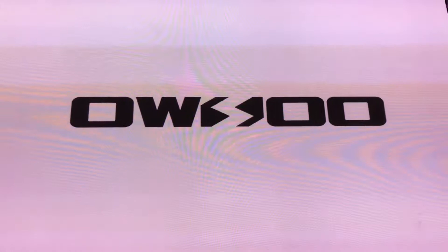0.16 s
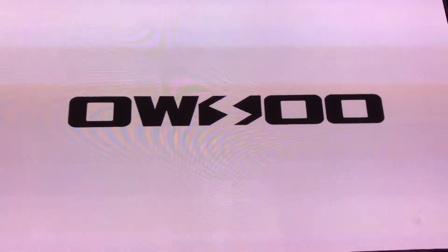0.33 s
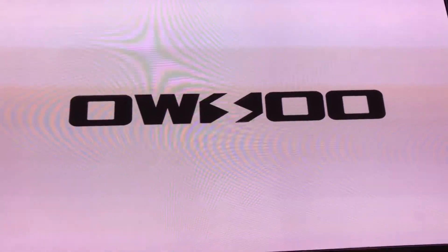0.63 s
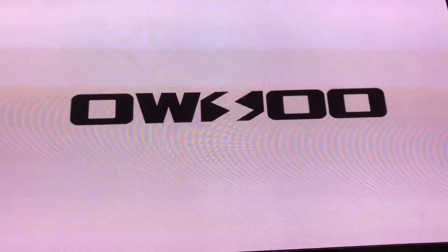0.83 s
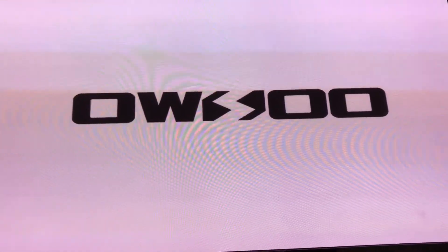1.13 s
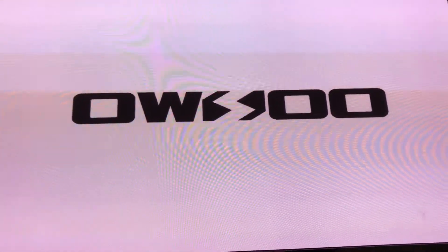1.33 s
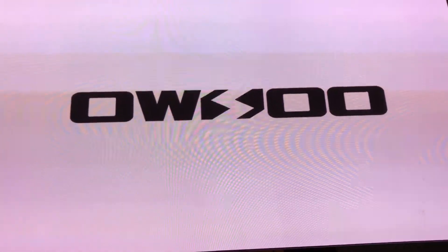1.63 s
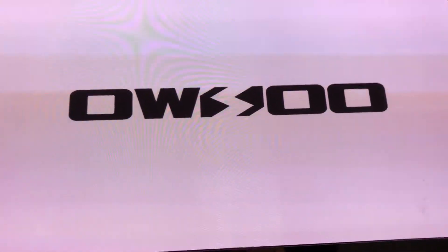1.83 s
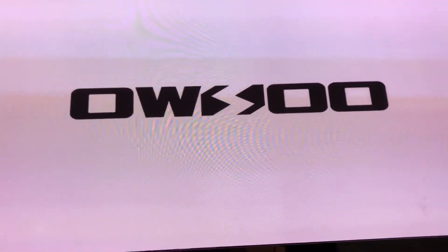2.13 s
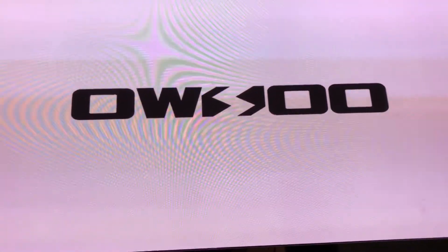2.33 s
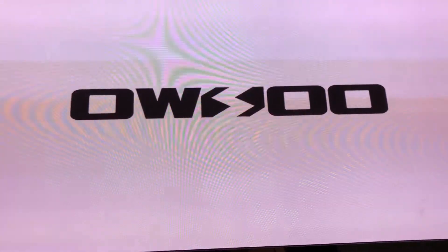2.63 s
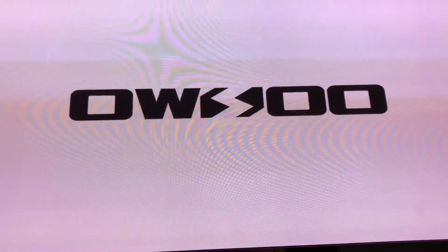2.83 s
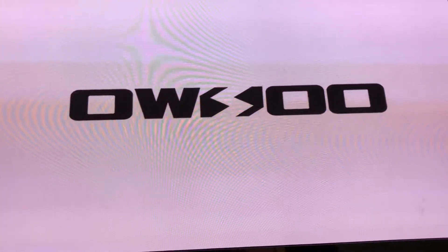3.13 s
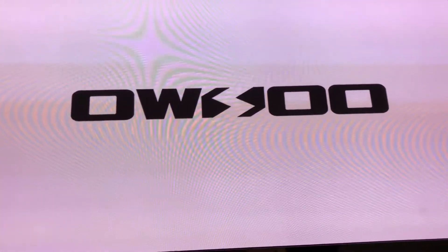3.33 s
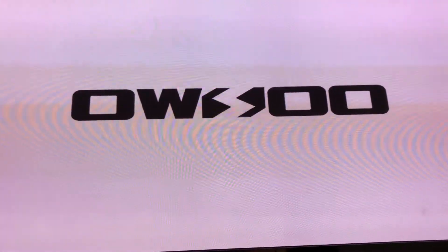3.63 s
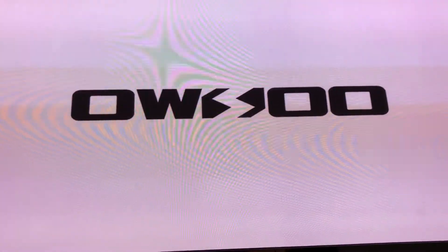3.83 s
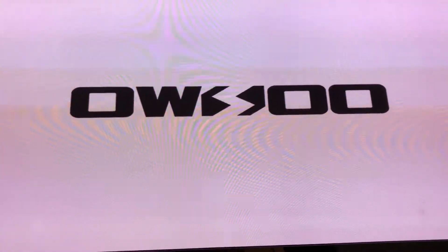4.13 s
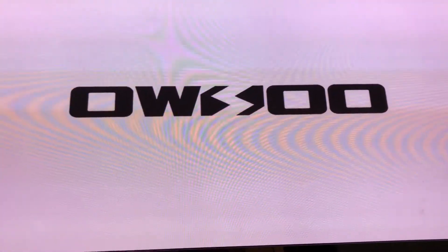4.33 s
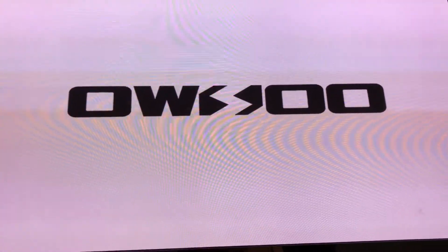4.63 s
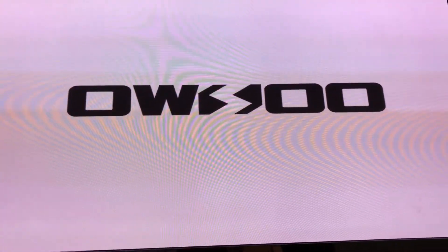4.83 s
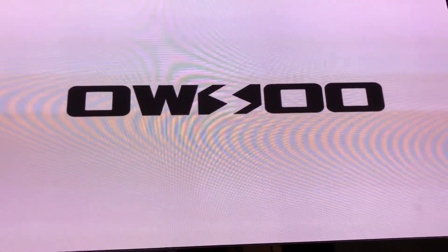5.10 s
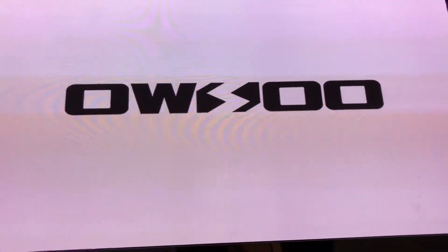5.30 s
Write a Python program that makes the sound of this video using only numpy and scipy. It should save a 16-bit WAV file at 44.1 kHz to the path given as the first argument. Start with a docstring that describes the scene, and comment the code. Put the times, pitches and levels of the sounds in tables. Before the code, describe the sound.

Close to the microphone, hard plastic buttons click down and up on a tabletop device in a small quiet room. A fast, loud run comes first, then a stiffer press, soft bumps, two small lighter presses and three fuller ones. A final cluster of weaker clicks ends in a short scuff of skin on casing, over very faint hiss and rumble.

```python
"""Push buttons in a quiet room

Plastic push buttons of a tabletop recorder snap down and up in a small quiet room, in runs and singly.
Each snap is a short dome burst and ten bands of knock and rattle; casing resonances and room noise ring on.
Soft bumps of dull noise come between; at the end a hand scuffs the casing as grains on noise.
Below lie a swelling room rumble, hiss and a faint electrical buzz looped 60 times a second."""
import sys
import numpy as np
from scipy import signal
from scipy.fft import rfft, irfft
from scipy.io import wavfile

SR = 44100
rng = np.random.default_rng(int(sys.argv[2]) if len(sys.argv) > 2 else 0)


def dump(signal):
    """Clip the signal to [-1, 1] and save it as 16-bit WAV at the path in sys.argv[1]."""
    limited = np.clip(np.atleast_2d(signal).T, -1, 1)
    pcm = np.round(limited * 32767).astype(np.int16)
    wavfile.write(sys.argv[1], SR, pcm)


N = 240766


def amp(db):
    """Gain of a level in dB."""
    return 10 ** (np.asarray(db) / 20)


def unit(x):
    """Scale to rms 1."""
    return x / np.sqrt(np.mean(x ** 2) + 1e-30)


def fading(t60, size):
    """Exponential decay that loses 60 dB in t60 seconds."""
    return amp(-60 * np.arange(size) / SR / t60)


def band(x, low_hz, high_hz):
    """Band-pass between two edges."""
    sos = signal.butter(2, [low_hz, high_hz], "band", fs=SR, output="sos")
    return signal.sosfilt(sos, x)


def coloured(x, spectrum):
    """Shape a noise by a spectrum, interpolated over log frequency; rms 1."""
    hz = np.fft.rfftfreq(len(x), 1 / SR) + 1   # 1 Hz up keeps the log finite
    at, db = np.transpose(spectrum)
    gain = amp(np.interp(np.log(hz), np.log(at), db))
    return unit(irfft(rfft(x) * gain, len(x)))


def curve(rows, column=1):
    """Gain over time from a dB column of rows that start with a time."""
    columns = np.transpose(rows)
    return amp(np.interp(np.arange(N) / SR, columns[0], columns[column]))


def drift(rate):
    """Slow random wander at about this rate a second; spread 1."""
    r = np.exp(-2 * np.pi * rate / SR)
    slow = rng.standard_normal(N + SR)
    for _ in range(2):
        slow = signal.lfilter([1], [1, -r], slow)
    slow = slow[SR:]   # drop the settling second
    return unit(slow - slow.mean())


# Colour of the hiss: f/Hz, level per Hz/dB (relative)
HISS_COLOUR = [(76, -30), (130, -1), (394, -5.5), (444, -2.5), (601, -11), (651, -4), (750, -7.5),
               (1400, -12), (1490, -14.5), (1750, -13.5), (2360, -16), (16000, -26)]
HISS_DB = -69   # rms


def hiss():
    """Steady noise with the colour of the quiet room."""
    return amp(HISS_DB) * coloured(rng.standard_normal(N), HISS_COLOUR)


# Colour of the low rumble: f/Hz, level per Hz/dB (relative)
RUMBLE_COLOUR = [(28, -63), (42, -14), (60, -6.5), (76, -5), (98, 2.5), (112, -18), (150, -11.5),
                 (300, -74)]
RUMBLE_DB, RUMBLE_SWELL_DB, RUMBLE_SWELLS_PER_S = -70.5, -1, 2.3
HAND_RUMBLE_DB = -17.5   # against the dull level of the scuff


def rumble():
    """Low noise that swells and sinks at random, and grows under the scuffing hand."""
    swell = amp(RUMBLE_DB + RUMBLE_SWELL_DB * drift(RUMBLE_SWELLS_PER_S))
    under_hand = amp(HAND_RUMBLE_DB) * curve(SCUFF_STROKE)
    return (swell + under_hand) * coloured(rng.standard_normal(N), RUMBLE_COLOUR)


# Strongest lines of the buzz: multiple of 60 Hz, level/dB (rms)
BUZZ_LINES = [(12, -95), (19, -92), (21, -94), (23, -87), (29, -95), (34, -90), (42, -96), (47, -95),
              (54, -96), (72, -96), (79, -91), (99, -95), (100, -91), (104, -96), (111, -95), (115, -92),
              (117, -96), (126, -94), (152, -94), (153, -93), (163, -96), (164, -95), (177, -89),
              (212, -95), (230, -96), (231, -96), (237, -93), (258, -92), (260, -95), (261, -95)]
BUZZ_REST_DB = -103   # typical rms of each remaining line


def buzz():
    """One period of electrical interference, looped: random weak multiples of 60 Hz and some strong ones."""
    period = SR // 60
    lines = amp(BUZZ_REST_DB) * np.sqrt(rng.exponential(1, period // 2 + 1))
    for multiple, db in BUZZ_LINES:
        lines[multiple] = amp(db)
    phases = np.exp(2j * np.pi * rng.random(len(lines)))
    one_period = irfft(lines * phases, period) * period / np.sqrt(2)   # turns rms into line height
    return np.resize(one_period, N)


# Soft bumps: t/s, level/dB (rms before the envelope), centre f/Hz, t60/s
BUMPS = [(1.5, -58, 554, 0.16), (1.821, -63.5, 457, 0.34), (2.03, -53, 170, 0.16), (5.04, -57, 610, 0.093),
         (5.261, -56, 199, 0.17)]


def bumps():
    """Short dull puffs of band-passed noise, soft at the start."""
    out, size = np.zeros(N + SR), SR // 4
    for s, db, hz, t60 in BUMPS:
        puff = unit(band(rng.standard_normal(size), hz / 2.44, hz * 1.28))
        envelope = fading(t60, size) * (1 - fading(0.063, size))
        at = round(s * SR)
        out[at:at + size] += amp(db) * puff * envelope
    return out[:N]


# Stroke of the hand on the casing: t/s, dull level/dB, bright level/dB
SCUFF_STROKE = [(5.245, -65, -80), (5.253, -65, -71), (5.291, -51.5, -59), (5.353, -54, -58.5),
                (5.403, -68.5, -72), (5.459, -61.5, -70)]
# Colour of skin on plastic: f/Hz, level per Hz/dB (relative)
SCUFF_COLOUR = [(88, -48), (150, -30), (309, 0), (398, -14), (431, -4.5), (905, 2.5), (1080, -2.5),
                (1630, -2), (16000, -20)]


def scuff():
    """Skin slips over plastic: dense uneven grains on noise, dull and bright parts following the stroke."""
    grains = rng.random(N) < 1500 / SR   # 1500 grains a second on average
    grains = grains * amp(2.7 * rng.exponential(1, N).clip(0, 5)) * rng.choice([-1, 1], N)
    rub = coloured(unit(grains) + 1.5 * rng.standard_normal(N), SCUFF_COLOUR)
    dull = signal.sosfiltfilt(signal.butter(2, 2700, fs=SR, output="sos"), rub)
    bright = rub - dull
    stroke = curve(SCUFF_STROKE) * unit(dull) + curve(SCUFF_STROKE, column=2) * unit(bright)
    started = np.arange(N) >= SCUFF_STROKE[0][0] * SR
    return stroke * started


# Snaps in order, for lead-ins and buttons: t/s, reference level/dB, kind of snap, brightness/dB per octave
# The first falls before time zero, so only its tail is heard.
SNAPS = [(-0.04, -25, "quick up", 1.5), (0.063, -24, "quick down", -0.1), (0.125, -18, "quick up", 0.5),
         (0.25, -24.5, "quick down", 0.5), (0.32, -17.5, "quick up", 0.5), (0.457, -24, "quick down", 0),
         (0.629, -50, "touch", 3.5), (0.835, -22.5, "stiff down", -1), (0.992, -27, "stiff up", 0.5),
         (2.314, -33, "small down", -1.55), (2.533, -32, "small up", -0.3),
         (2.779, -34, "small down", -0.5), (2.969, -30.5, "small up", 0.3), (3.5, -27, "wide down", 0.4),
         (3.678, -25.5, "wide up", 0), (3.892, -27.5, "wide down", 0.5), (4.074, -26.5, "wide up", 0),
         (4.559, -26.5, "wide down", 1.3), (4.81, -26.5, "wide up", 0), (5.113, -34.5, "last", 1),
         (5.122, -41, "last", 0), (5.15, -44, "last", -1.5), (5.233, -56.5, "touch", -4)]
# Each button going down or up: thump f/Hz, dome f/Hz, overtone f/Hz, then level/dB against the snap of:
# first contact, thump, dome, overtone, thud, low knock, high knock, clack, snap, tick, spit
KINDS = {"quick down": (885, 1868, 2698, -6.5, -19.5, -18.5, -27, -27.5, -19, -15, -14, -14, -12.5, -20),
         "quick up": (738, 1859, 2654, -6, -26, -21.5, -24, -35.5, -21.5, -15, -14.5, -11.5, -16, -28),
         "stiff down": (949, 1693, 2677, -1.5, -20.5, -14.5, -16, -33, -20, -8, -12, -15.5, -16.5, -24),
         "stiff up": (527, 1270, 2527, -3, -14, -36, -24, -28.5, -8, -24, -18, -25, -19, -28),
         "small down": (679, 1779, 3504, -17, -15, -19.5, -31, -25.5, -11, -14.5, -9.5, -8, -5.5, -18),
         "small up": (635, 1513, 3107, -9.5, -14.5, -21, -22, -28, -13, -13, -9, -12.5, -10, -16),
         "wide down": (841.5, 1503, 2293, -0.5, -15, -22.5, -26, -30, -12.5, -13.5, -14.5, -22.5, -16.5, -30),
         "wide up": (691, 1510, 2336, 2, -22, -14.5, -17, -33.5, -12.5, -13.5, -11, -18, -9.5, -19),
         "last": (649, 1902, 3808, -1, -8, -15, -15, -32.5, -13.5, -27, -9.5, -9, -7.5, -21),
         "touch": (747, 1500, 3000, -3, -11.5, -16, -25, -20.5, -19, -11, -21, -31, -28, -31)}
# Faint narrow noise rising just before the stiff down, wide down and wide up snaps, by kind:
# level/dB against the snap
LEAD_IN_DB = {"stiff down": -19.5, "wide down": -29, "wide up": -24}
LEAD_IN_SPREAD = 1.13   # the band reaches this factor around the dome's pitch
LEAD_IN_RISE_S = 0.033   # time for a rise of 60 dB


def lead_ins():
    """Narrow noise at the dome's pitch that rises steeply and stops where the snap takes over."""
    out, size = np.zeros(N), 1024
    for s, snap_db, kind, _ in SNAPS:
        if kind in LEAD_IN_DB:
            dome_hz = KINDS[kind][1]
            noise = rng.standard_normal(2 * size)
            tone = band(noise, dome_hz / LEAD_IN_SPREAD, dome_hz * LEAD_IN_SPREAD)
            tone = unit(tone[size:])   # skip the filter's onset
            rise = fading(LEAD_IN_RISE_S, size)[::-1]
            at = round((s + 0.00094) * SR)
            out[at - size:at] += amp(snap_db + LEAD_IN_DB[kind]) * tone * rise
    return out


def first_contact(pitch_hz, cycles):
    """The dome under the cap flips: a burst of a few cycles, height about 1."""
    phase = np.arange(128) / SR * pitch_hz
    return -np.sin(2 * np.pi * phase) * np.exp(-((phase - cycles) / (0.56 * cycles)) ** 2)


def contact(share, t60, size=2048):
    """One blow with its share of the energy, then loose parts rattling unevenly."""
    share = np.clip(share, 0, 1)
    uneven = amp(7.6 * rng.standard_normal(size // 32)).repeat(32)
    rattle = rng.standard_normal(size) * uneven * fading(t60, size)
    rattle *= 1 - fading(0.0064, size)   # the rattle sets in just after the blow
    out = np.sqrt(1 - share) * rattle / np.linalg.norm(rattle)
    out[0] = -np.sqrt(share)
    return out


# Resonances of casing and table: f/Hz
CASING_HZ = [312, 520, 652, 820, 950, 1085, 1330, 1380, 1473, 1570, 1764, 1888, 2047, 2330, 2480, 2655,
             3360, 3810]
# The same resonances in order: level/dB, t60/s
CASING = [(-34, 0.27), (-35.5, 0.18), (-30.5, 0.11), (-31, 0.083), (-34, 0.11), (-47.5, 0.22), (-40, 0.2),
          (-61.5, 0.63), (-42, 0.16), (-46.5, 0.29), (-43, 0.27), (-34.5, 0.035), (-63, 0.046),
          (-37, 0.047), (-48.5, 0.35), (-32, 0.057), (-35.5, 0.052), (-48, 0.066)]


def casing_ring(size):
    """Impulse response of the casing: decaying sines, signs alternating."""
    t = np.arange(size) / SR
    ring = np.zeros(size)
    for k, (hz, (db, t60)) in enumerate(zip(CASING_HZ, CASING)):
        ring += (-1) ** k * amp(db) * fading(t60, size) * np.sin(2 * np.pi * hz * t)
    return ring


# Fixed bands of a snap, thud to spit: low edge f/Hz, high edge f/Hz
PART_EDGES_HZ = [(270, 590), (950, 1586), (1600, 2270), (2400, 4070), (4400, 5680), (6200, 9420),
                 (11800, 15000)]
# All ten parts, thump to spit: blow's share of energy, rattle t60/s, room t60/s, room level/dB against the part
PARTS = [(0.66, 0.031, 0.35, 2.5), (0.25, 0.028, 0.34, 1), (0.74, 0.023, 0.28, 7.5),
         (0.68, 0.085, 0.31, 13.5), (0.44, 0.024, 0.28, 6.5), (0.91, 0.018, 0.22, 5),
         (0.057, 0.013, 0.37, 0.5), (0.075, 0.041, 0.31, -2), (0.042, 0.029, .26, 0.5),
         (0.11, 0.02, 0.14, 3.5)]
# Thump, dome and overtone reach this factor around their pitch
TUNED_SPREADS = (1.294, 1.05, 1.035)
BURST_S = 0.0013   # the level of a part is that of its whole energy spread over this time
PIVOT_HZ = 1500   # brightness tilts the spectrum about this
LEAD = SR // 10   # samples played before time zero


def buttons():
    """Every snap excites ten parts of the spectrum; they ring in the casing and die away in the room."""
    size = SR // 2
    burst = np.sqrt(BURST_S * SR)
    blows, echoes = np.zeros((2, LEAD + N + size))
    for s, snap_db, kind, tilt_db in SNAPS:
        *pitches_hz, contact_db = KINDS[kind][:4]
        part_db = KINDS[kind][4:]
        at = LEAD + round((s + 0.001406) * SR)
        tuned = [(hz / spread, hz * spread) for hz, spread in zip(pitches_hz, TUNED_SPREADS)]
        all_edges = tuned + list(PART_EDGES_HZ)
        for edges, db, (share, rattle_t60, room_t60, room_db) in zip(all_edges, part_db, PARTS):
            octaves = np.log2(np.sqrt(np.prod(edges)) / PIVOT_HZ)
            level_db = snap_db + db + tilt_db * octaves
            hit = band(contact(share, rattle_t60), *edges)
            blows[at:at + len(hit)] += amp(level_db) * burst * hit / np.linalg.norm(hit)
            # dense echoes build up within a few ms, in a new pattern each time
            envelope = fading(room_t60, size) * (1 - fading(0.0046, size))
            tail = band(rng.standard_normal(size) * envelope, *edges)
            echoes[at:at + size] += amp(level_db + room_db) * burst * tail / np.linalg.norm(tail)
        at = LEAD + round((s + 0.0006) * SR)
        flip = first_contact(max(pitches_hz[1], 1550), cycles=2.3)
        echoes[at:at + 128] += amp(snap_db + contact_db) * flip   # bypasses the casing
    ringing = signal.fftconvolve(blows, casing_ring(size))[:len(blows)]
    return (blows + echoes + ringing)[LEAD:LEAD + N]


PORT_DIP_HZ, PORT_DIP_WIDTH_HZ = 9640, 7400
PORT_DIP_DEPTH = 0.57   # share taken out at the centre; 1 is silence


def port(x):
    """Sound from the table loses part of a treble band on its way into the microphone port."""
    peak = signal.iirpeak(PORT_DIP_HZ, PORT_DIP_HZ / PORT_DIP_WIDTH_HZ, SR)
    return x - PORT_DIP_DEPTH * signal.lfilter(*peak, x)


def scene():
    """All sources at one microphone; only those on the table pass the port dip."""
    background = hiss() + rumble() + buzz()
    table = bumps() + scuff() + lead_ins() + buttons()
    return (background + port(table))[None]


def record(dry):
    """A steep low-pass cuts the top above 15750 Hz."""
    return signal.sosfilt(signal.ellip(10, .5, 45, 15750, fs=SR, output="sos"), dry)


dry = scene()
out = record(dry)
dump(out)
```